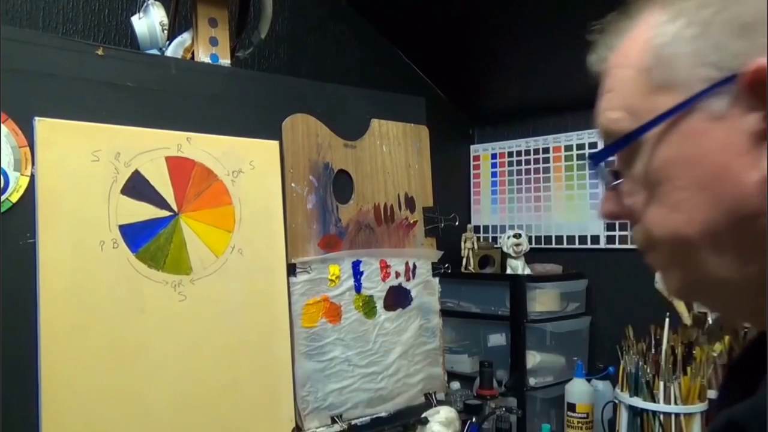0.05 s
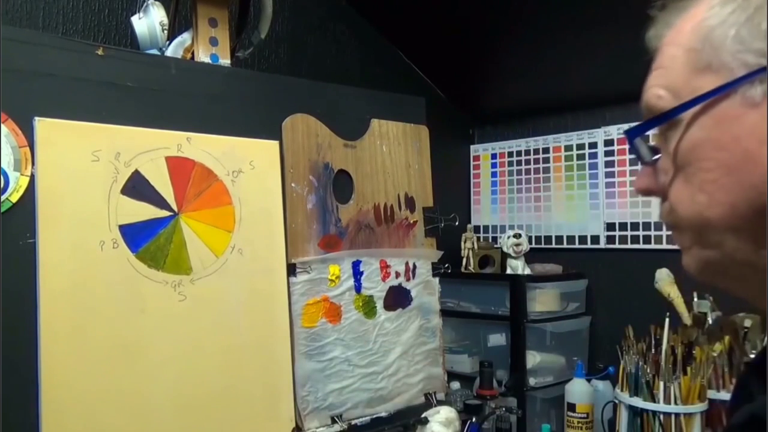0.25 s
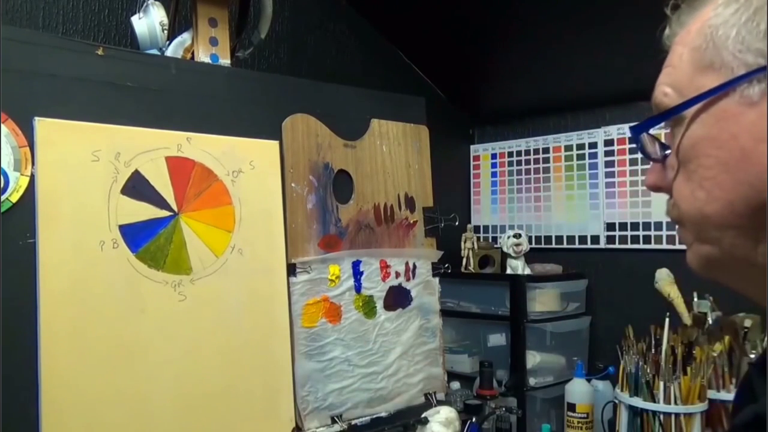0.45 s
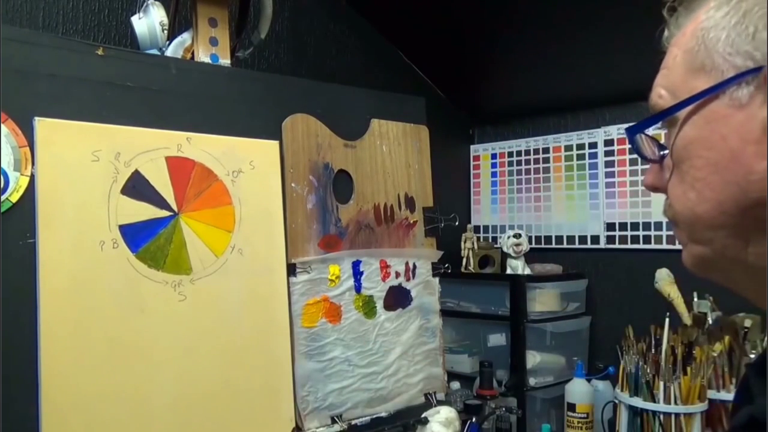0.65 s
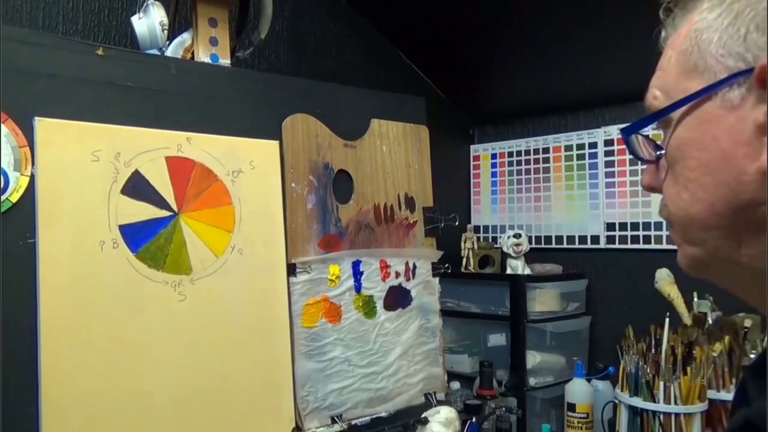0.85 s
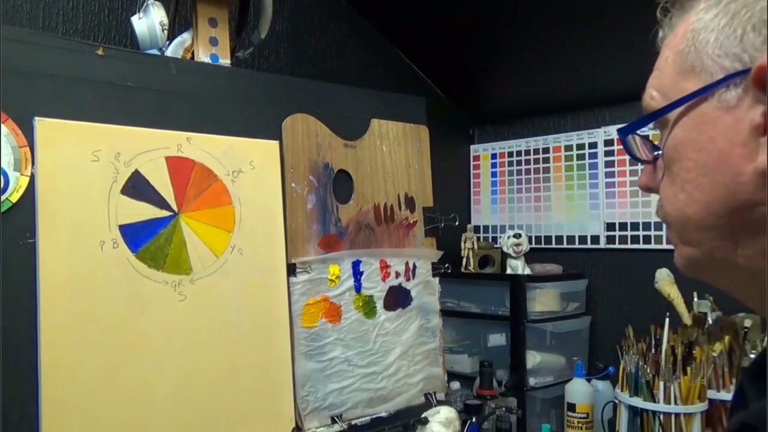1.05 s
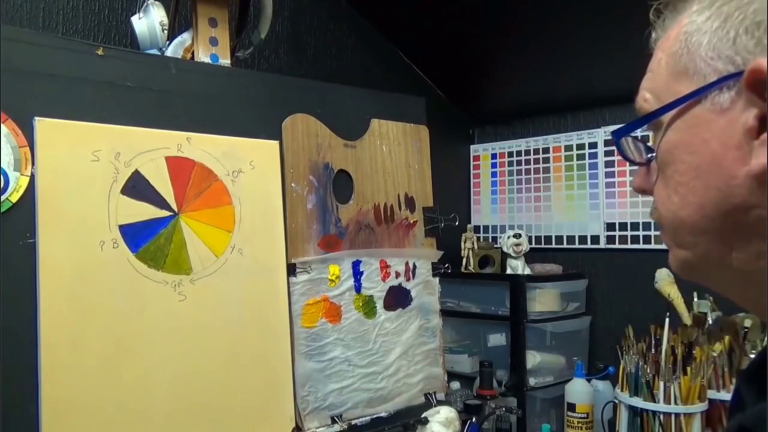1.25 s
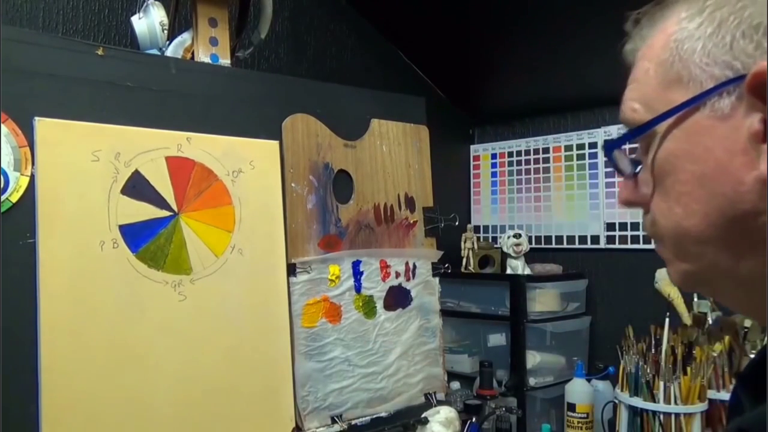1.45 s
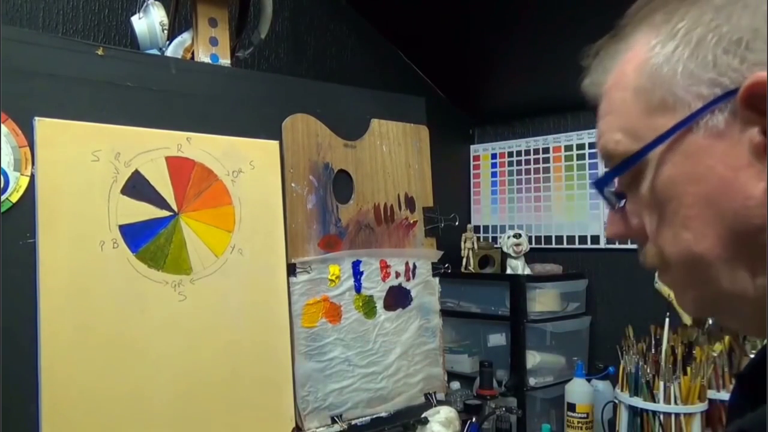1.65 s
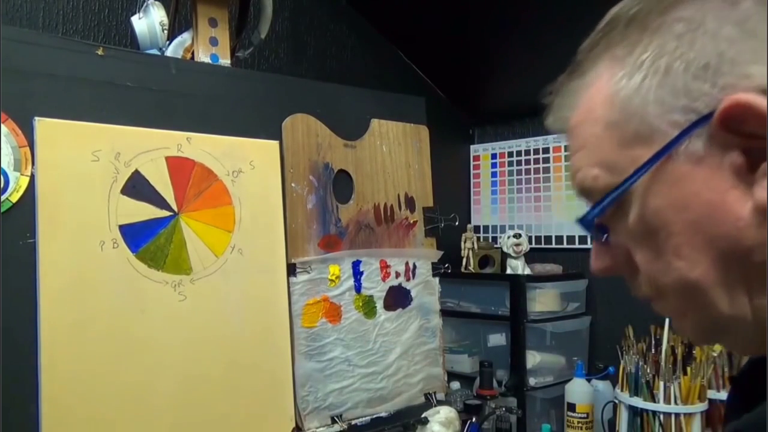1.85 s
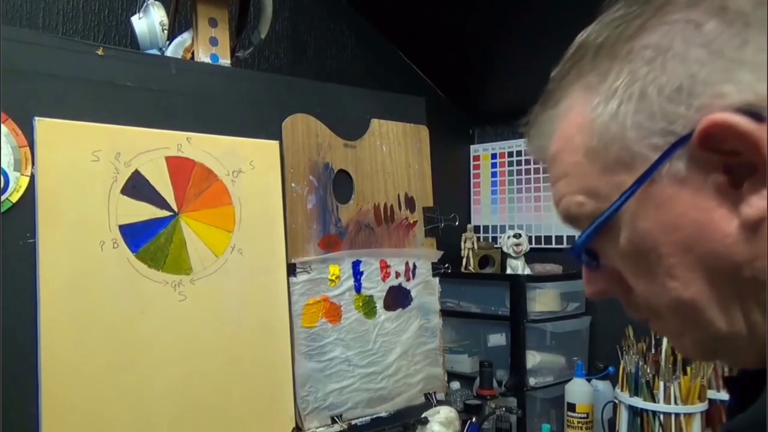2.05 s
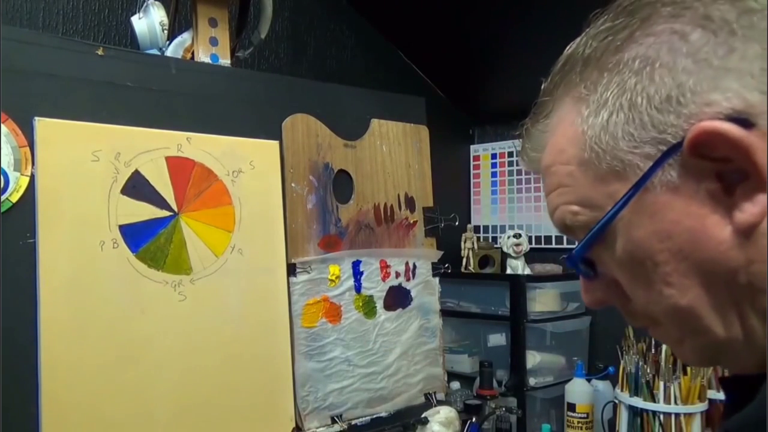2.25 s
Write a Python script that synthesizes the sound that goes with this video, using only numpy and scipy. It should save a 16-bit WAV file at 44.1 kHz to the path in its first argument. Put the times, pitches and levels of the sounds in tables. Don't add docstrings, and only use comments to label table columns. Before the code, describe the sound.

A paintbrush swishes in a jar of water, heard close in a small quiet studio. From about 0.1 seconds, soft bubbly blips and wet ticks begin, thickening from 0.4 into quick gurgling strokes with fizzy froth. A sharp bright click comes near 1.14, the strongest plops around 1.4 to 1.5. It fades by 1.8, leaving ventilation hiss, faint whine and a barely audible drip near 2.1.

```python
import sys
import numpy as np
from scipy import signal
from scipy.fft import rfft, irfft, next_fast_len
from scipy.io import wavfile
from scipy.ndimage import map_coordinates

SR = 44100
rng = np.random.default_rng(int(sys.argv[2]) if len(sys.argv) > 2 else 0)


def store_pcm(level_fs):
    pcm = np.round(np.clip(level_fs, -1, 1) * 32767).astype(np.int16)
    wavfile.write(sys.argv[1], SR, np.atleast_2d(pcm).T)


def amplitude_ratio(level_db):
    exponent = np.asarray(level_db, float) / 20
    return 10 ** exponent


N = 101429


def unit(x):
    return x / np.sqrt(np.mean(x ** 2) + 1e-20)


def along(points, hz):
    f, value = np.transpose(points)
    return np.interp(np.log(hz + 1), np.log(f + 1), value)


def wobble(rate_hz):
    knots = rng.standard_normal(int(N * rate_hz / SR) + 4)
    return map_coordinates(knots, [np.arange(N) * rate_hz / SR])


def filtered(x, response):
    m = next_fast_len(x.shape[-1] + 8192)
    spectrum = rfft(x, m) * response(np.fft.rfftfreq(m, 1 / SR))
    return irfft(spectrum, m)[..., :x.shape[-1]]


PITCH_RISE = 0.017


def bubbles(s, db, hz, cycles, onset_cycles, size):
    turns = hz[:, None] * np.arange(size) / SR
    age = turns / cycles[:, None]
    phase = turns * (1 + PITCH_RISE * (age - 0.3) / 2)
    envelope = amplitude_ratio(db[:, None] - 60 * age) * (1 - np.exp(-turns / onset_cycles))
    tones = envelope * np.sin(2 * np.pi * phase)
    where = np.round(s * SR).astype(int)[:, None] + np.arange(size)
    return np.bincount(where.ravel(), tones.ravel(), N + size + SR)[:N]


# t/s, level/dB (peak), f/Hz, life/cycles
BIG_BUBBLES = [(0.113, -37, 525, 57), (0.148, -21, 676, 15.4), (0.412, -30, 1020, 20),
               (0.497, -30, 944, 12), (0.562, -29, 946, 25), (0.632, -14.5, 882, 11.7),
               (0.804, -17.5, 775, 10.7), (0.879, -12, 920, 6.1), (0.914, -30, 605, 18),
               (0.948, -30, 603, 15.7), (0.963, -27, 890, 16), (1.02, -24.5, 637, 12.2),
               (1.047, -17.5, 860, 8.2), (1.125, -29.5, 606, 23), (1.14, -26.5, 803, 24),
               (1.203, -22.5, 830, 21), (1.208, -27.5, 520, 15), (1.241, -34, 508, 13),
               (1.292, -34.5, 590, 32), (1.395, -25, 528, 21), (1.407, -27, 830, 18), (1.461, -4, 785, 4.1),
               (1.475, -12.5, 760, 7.7), (1.525, -34.5, 613, 28), (1.632, -37.5, 874, 38)]
# t/s, level/dB (peak), f/Hz, life/cycles
MIDDLE_BUBBLES = [(0.147, -36.5, 1410, 87), (0.303, -36.5, 1360, 38), (0.356, -33.5, 1350, 44),
                  (0.372, -22, 1360, 52), (0.38, -22.5, 1350, 67), (0.4937, -22.5, 1360, 16.7),
                  (0.5533, -25.5, 1360, 49), (0.6176, -26.5, 1344, 40), (0.632, -15, 1360, 16.4),
                  (0.7226, -25.5, 1190, 37), (0.8141, -21.5, 1430, 8.4), (0.8832, -15, 1215, 10),
                  (0.9518, -14, 1280, 5.9), (0.984, -28.5, 1467, 38), (1.0027, -23.5, 1390, 29),
                  (1.1193, -12, 1360, 10), (1.1403, -29, 1230, 55), (1.232, -10, 1556, 11),
                  (1.2909, -26, 1200, 33), (1.4087, -14, 1355, 16), (1.419, -20, 1210, 20),
                  (1.62, -22, 1350, 14), (1.63, -22.5, 1350, 29), (1.696, -32.5, 1380, 36)]
# t/s, level/dB (peak), f/Hz, life/cycles
SMALL_BUBBLES = [(0.1935, -31, 2030, 25), (0.2211, -20.5, 2140, 46), (0.305, -26.5, 2870, 51),
                 (0.398, -22, 2040, 60), (0.404, -26.5, 2040, 50), (0.413, -24, 3030, 41),
                 (0.42, -34, 2010, 83), (0.4112, -10, 2600, 12.5), (0.4614, -20.5, 2290, 27),
                 (0.4706, -15, 2600, 30), (0.5518, -11.5, 1910, 24), (0.5555, -30, 2040, 25),
                 (0.558, -13.5, 2130, 27), (0.575, -21.5, 2130, 47), (0.598, -23, 2050, 32),
                 (0.611, -24, 2130, 27), (0.5648, -26, 2130, 52), (0.6184, -28.5, 3300, 27),
                 (0.6379, -18.5, 2670, 22.6), (0.642, -24, 3210, 40), (0.7125, -22, 2370, 22),
                 (0.7165, -16.5, 2130, 62), (0.7235, -15, 2240, 46), (0.7305, -44, 2320, 25),
                 (0.7728, -30.5, 3300, 40), (0.78, -28.5, 2256, 46), (0.8827, -22.5, 2500, 23),
                 (0.9108, -22, 2310, 26), (0.957, -12, 3480, 29), (0.9828, -28.5, 2130, 34)]
# t/s, level/dB (peak), f/Hz, life/cycles
MORE_SMALL_BUBBLES = [(1.0276, -24, 3070, 21), (1.0547, -23, 2280, 15), (1.1105, -22.5, 2130, 19),
                      (1.1398, -17, 2024, 33), (1.1892, -27, 1960, 40), (1.1968, -18, 2420, 33),
                      (1.23, -24.5, 3420, 44), (1.243, -15.5, 3270, 16), (1.2885, -21, 2200, 38),
                      (1.297, -21, 2206, 35), (1.3458, -28, 2210, 57), (1.3648, -11, 2180, 13),
                      (1.4049, -3.5, 2220, 18), (1.4348, -43, 2140, 34), (1.4521, -16, 2130, 17),
                      (1.458, -21, 3220, 26), (1.5259, -18.5, 2120, 10.5), (1.528, -37, 3420, 57),
                      (1.575, -43, 2420, 70), (1.5584, -31, 2130, 54), (1.6149, -24, 2150, 37),
                      (1.621, -22.5, 2090, 86), (1.627, -26.5, 2600, 70), (1.638, -49, 2030, 40),
                      (1.6847, -36, 2090, 50), (1.697, -31, 2350, 37)]
# t/s, level/dB (peak), f/Hz, life/cycles
LATE_BUBBLES = [
    (1.377, -24.5, 5050, 37),
    (2.073, -52, 3020, 140),
]
ONSET_CYCLES, FLUTTER_DB = 2.63, 2.5
CLOUD_DB, CLOUD_S, CLOUD_OCTAVES, CLOUD_CYCLES = -12, 0.022, 0.22, 15


def trapped_air(companions):
    s, db, hz, cycles = np.transpose(
        BIG_BUBBLES + MIDDLE_BUBBLES + SMALL_BUBBLES + MORE_SMALL_BUBBLES + LATE_BUBBLES)
    main = bubbles(s, db, hz, cycles, ONSET_CYCLES, size=3000)
    when, size, pitch, life = rng.random((4, len(s), companions))
    cloud_s = s[:, None] + CLOUD_S * when ** 1.5
    cloud_db = db[:, None] + CLOUD_DB - 8 * size - 6 * when
    cloud_hz = hz[:, None] * 2 ** (CLOUD_OCTAVES * (2 * pitch - 1))
    cloud_cycles = CLOUD_CYCLES * (0.84 + life)
    cloud = bubbles(cloud_s.ravel(), cloud_db.ravel(), cloud_hz.ravel(), cloud_cycles.ravel(),
                    2 * ONSET_CYCLES, size=1200)
    return main * amplitude_ratio(FLUTTER_DB * wobble(130)) + cloud


# t/s, level/dB (peak), f/Hz (centre), t60/s
SPRAY_TICKS = [(0.146, -34, 8800, 0.06), (0.2215, -18.5, 3530, 0.0071), (0.2977, -26, 6100, 0.032),
               (0.302, -32, 2970, 0.052), (0.3354, -39.5, 8100, 0.14), (0.41, -20.5, 4250, 0.025),
               (0.4577, -24, 9300, 0.018), (0.4794, -26.5, 10000, 0.011), (0.4902, -23, 4320, 0.0058),
               (0.7151, -30.5, 4640, 0.017), (0.793, -30, 4870, 0.055), (0.8581, -27.5, 4870, 0.018),
               (0.912, -27.5, 4100, 0.015), (0.9458, -21, 4340, 0.025), (0.9584, -20, 5700, 0.012),
               (0.985, -28.5, 7650, 0.028), (1.058, -19, 8000, 0.0081), (1.126, -37, 5500, 0.011),
               (1.1323, -13, 7050, 0.0099), (1.141, -5.5, 8750, 0.0057), (1.142, -16, 10300, 0.055),
               (1.209, -20.5, 10500, 0.02), (1.2291, -18.5, 8450, 0.01), (1.229, -17, 4300, 0.023),
               (1.241, -22.5, 8550, 0.016), (1.31, -32.5, 5230, 0.017), (1.378, -34, 4840, 0.029),
               (1.404, -12, 8300, 0.012), (1.4053, -16.5, 4200, 0.025), (1.4527, -22.5, 6200, 0.058),
               (1.5403, -32, 6250, 0.043), (1.6279, -24, 6560, 0.016), (1.786, -40.5, 4000, 0.035)]
COLOUR_OCTAVES, SKIRT_DB = 0.42, -7.5
CRACK_DB, CRACK_T60_S = 8, 0.002
PATTER_DB, PATTER_LASTS = -13, 5.8


def spray():
    out, t = np.zeros(N + SR), np.arange(4096) / SR
    soft_start = 1 - np.exp(-t * SR / 12)
    for s, db, hz, t60 in SPRAY_TICKS:
        def colour(f):
            peak = np.exp(-(np.log2((f + 1) / hz) / COLOUR_OCTAVES) ** 2)
            return peak + amplitude_ratio(SKIRT_DB) * f * f / (f * f + 1500 ** 2)
        puff = unit(filtered(rng.standard_normal(len(t)), colour))
        crack = amplitude_ratio(CRACK_DB - 60 * t / CRACK_T60_S) * np.sin(2 * np.pi * hz * t)
        uneven_db = 5 * np.repeat(rng.standard_normal(64), 64)
        patter = amplitude_ratio(PATTER_DB - 60 * t / (t60 * PATTER_LASTS) + uneven_db)
        tick = crack + (amplitude_ratio(-60 * t / t60) + patter) * soft_start * puff
        out[round(s * SR):][:len(t)] += amplitude_ratio(db - 12.0) * tick
    return out[:N]


# f/Hz, width/Hz, level/dB
JAR_MODES = [(606, 26, 7), (958, 365, 3), (1360, 230, 0.5), (2130, 43, -6.5), (3190, 400, 2), (3510, 79, 3)]


def jar(x, ring_db):
    def response(f):
        modes = (amplitude_ratio(ring_db + db) * 1j * f * w / (c * c - f * f + 1j * f * w) for c, w, db in JAR_MODES)
        return 1 + sum(modes)
    return filtered(x, response)


# f/Hz, level/dB (per Hz)
FROTH_COLOUR = [(240, -44), (400, -11.5), (1810, 0.5), (2140, 7), (3830, -7.5), (6000, -13.5), (11000, -16),
                (14300, -58), (22000, -120)]
# t/s, level/dB
BRISTLE_FIZZ = [(0.1, -5), (0.3, -1), (0.42, 2.5), (0.5, -1), (0.56, -5.5), (0.61, -10), (0.66, -2),
                (0.78, 1), (0.9, 4.5), (1.05, -1), (1.2, 3.5), (1.3, 5.5), (1.42, 1.5), (1.55, 4.5),
                (1.64, 1.5), (1.72, -0.5)]
FROTH_DB, JAR_DB, WASH_DB, SURGE_DB = -44, -3, -4, 2
FROTH_RATE_HZ, FROTH_LIFE_S, FROTH_SWELL = 2600, 0.006, 0.12
BRISTLE_HZ = 2900
CHURN_LEAD_S, CHURN_RISE_S, CHURN_T60_S, CHURN_GROWS = 0.004, 0.008, 0.24, 0.5


def froth():
    when, pitch, size, life = rng.random((4, int(FROTH_RATE_HZ * N / SR)))
    hz = 400 * 27 ** pitch
    size_db = along(FROTH_COLOUR, hz) + 10 * np.log10(hz) - 1.3 * np.log(size + 0.02)
    cycles = 4 + hz * FROTH_LIFE_S * (1 + 2 * life)
    swarm = bubbles(when * N / SR, size_db, hz, cycles, FROTH_SWELL * cycles[:, None], size=900)
    wash = filtered(rng.standard_normal(N), lambda f: amplitude_ratio(along(FROTH_COLOUR, f)))
    slosh = unit(swarm) + amplitude_ratio(WASH_DB) * unit(wash)
    high = filtered(slosh, lambda f: f ** 6 / (f ** 6 + BRISTLE_HZ ** 6))
    fizz_db = np.interp(np.arange(N) / SR, *np.transpose(BRISTLE_FIZZ))
    slosh = slosh + high * (amplitude_ratio(fizz_db) - 1)

    s, db = np.transpose(MIDDLE_BUBBLES + SMALL_BUBBLES + MORE_SMALL_BUBBLES + SPRAY_TICKS)[:2]
    age_s = np.clip(np.arange(0, N, 32) / SR - s[:, None] + CHURN_LEAD_S, 0, None)
    decay = amplitude_ratio(2 * CHURN_GROWS * db[:, None] - 120 * age_s / CHURN_T60_S)
    power = np.sum(decay * (1 - np.exp(-age_s / CHURN_RISE_S)), axis=0)
    churn = np.repeat(np.sqrt(power), 32)[:N]
    return unit(unit(jar(slosh, JAR_DB)) * churn) * amplitude_ratio(FROTH_DB + SURGE_DB * wobble(30.17))


# f/Hz, t60/s
ROOM_DECAY = [(400, 0.26), (2000, 0.15), (10000, 0.057)]
SHARED_ROOM = 0.72
ROOM_DELAY = 130


def studio(x):
    out, step = np.zeros((2, N + SR)), SR // 4
    for start in range(0, N, step):
        shared, b = rng.standard_normal((2, SR // 2))
        apart = (1 - SHARED_ROOM) * 2 * b
        hz, t, z = signal.stft(np.array([shared + apart, shared - apart]), SR, nperseg=256)
        decay = amplitude_ratio(-60 * t / along(ROOM_DECAY, hz)[:, None])
        tail = signal.istft(z * decay, SR, nperseg=256)[1]
        wet = signal.fftconvolve(x[None, start:start + step], tail / np.linalg.norm(tail[0]), axes=1)
        begin = start + ROOM_DELAY
        out[:, begin:][:, :wet.shape[1]] += wet[:, :N + SR - begin]
    return out[:, :N]


# f/Hz, level/dB (per Hz)
HISS_COLOUR = [(25, -26), (90, -22), (250, -5), (340, -3), (600, -10.5), (950, -3), (1750, -8),
               (2300, -11.5), (5500, -18.5), (10500, -17)]
# f/Hz, correlation/1
HISS_LIKENESS = [(60, 0.63), (300, 0.91), (2000, 0.28), (10000, 0.99)]
# f/Hz, level/dB (rms)
FAN_WHINES = [(947.5, -67), (1163, -66), (1545, -62), (1723, -70)]
# f/Hz, level/dB (rms)
MAINS_HUM = [(49, -81), (120, -78), (150, -76.5)]
HISS_DB = -50.5


def ventilation():
    def spread(hz):
        angle = np.arccos(np.clip(along(HISS_LIKENESS, hz), -1, 1)) / 2
        return amplitude_ratio(along(HISS_COLOUR, hz)) * np.array([np.cos(angle), np.sin(angle)])
    mid, side = filtered(rng.standard_normal((2, N)), spread)
    hiss = amplitude_ratio(HISS_DB + 1.9 * wobble(7.58)) * unit(np.array([mid + side, mid - side]))
    t = np.arange(N) / SR
    tones = np.zeros(N)
    for hz, db in FAN_WHINES:
        tones += amplitude_ratio(db + 2.5 + 3.45 * wobble(8.8)) * np.sin(2 * np.pi * hz * t + 1.77 * wobble(25))
    for hz, db in MAINS_HUM:
        tones += amplitude_ratio(db + 2.8 * wobble(9.06)) * np.sin(2 * np.pi * hz * t)
    return hiss + tones


def scene():
    strokes = jar(trapped_air(companions=4) + spray(), ring_db=-7)
    water = filtered(strokes + froth(), lambda f: f ** 4 / (f ** 4 + 300 ** 4))
    return water + amplitude_ratio(-6) * studio(water) + ventilation()


def low_pass(x):
    return signal.sosfilt(signal.butter(12, 12180, fs=SR, output="sos"), x)


# f/Hz, left minus right level/dB
PORT_LEAN = [(60, 2.5), (400, -4.5), (3000, -1), (11000, 0)]
TOP_HZ, LEAK_DB, LEAK_TOP_HZ = 11030, -33, 13200


def record(dry):
    def ports(hz):
        lean = amplitude_ratio(along(PORT_LEAN, hz) * np.array([[0.5], [-0.5]]))
        return lean * np.where(hz < TOP_HZ, 1, amplitude_ratio(LEAK_DB) * (hz < LEAK_TOP_HZ))
    mix = filtered(dry, ports)
    return low_pass(mix)


dry = scene()
out = record(dry)
store_pcm(out)
```